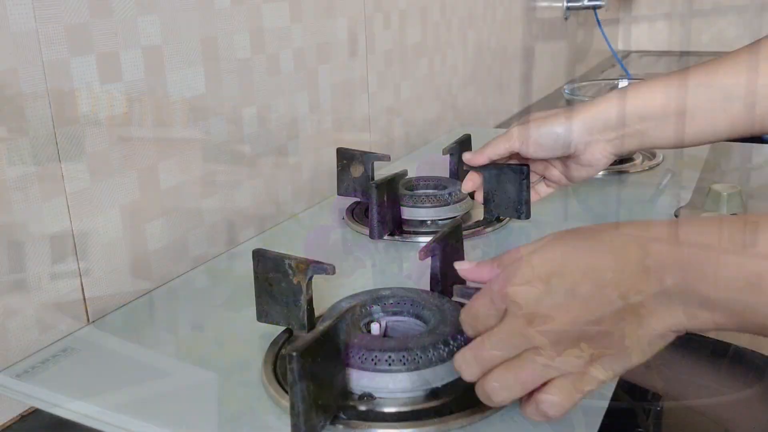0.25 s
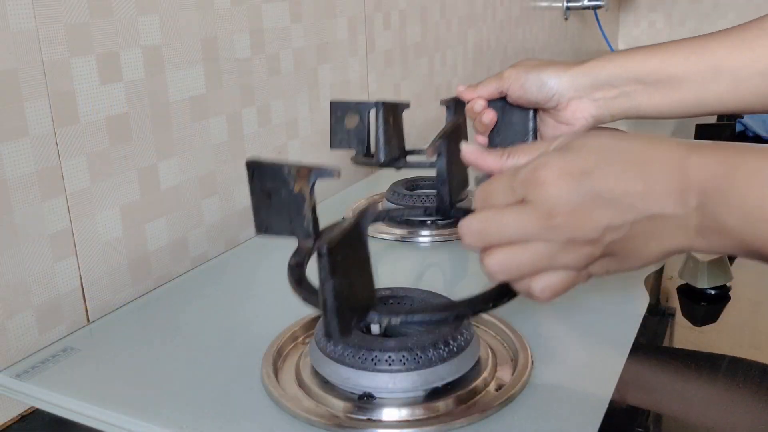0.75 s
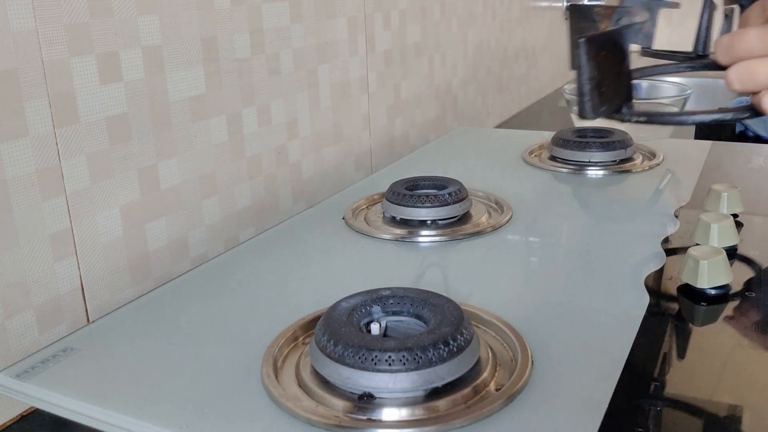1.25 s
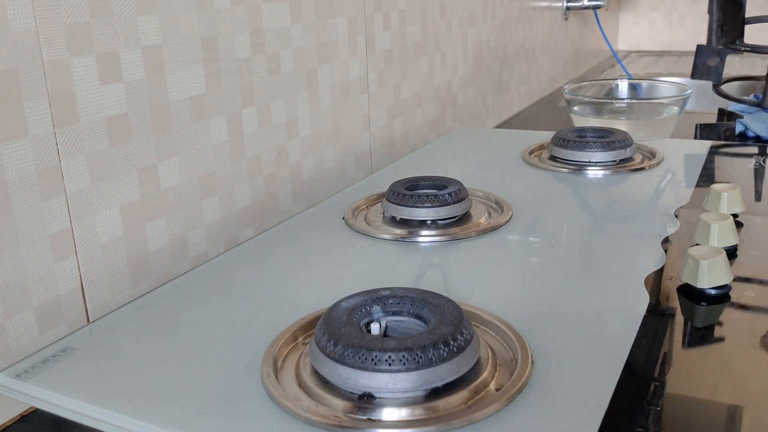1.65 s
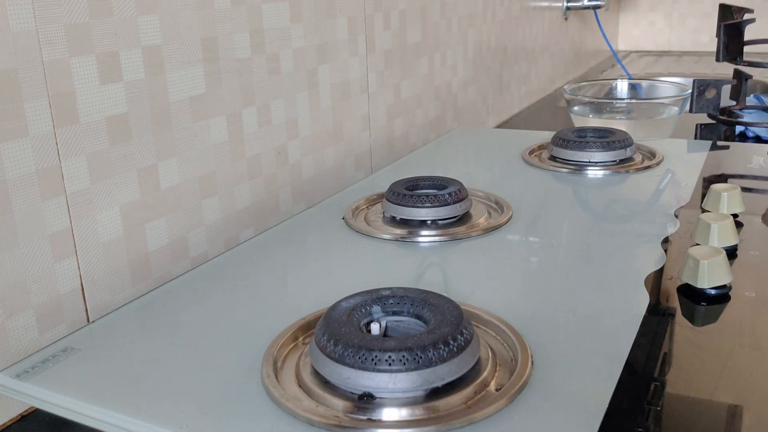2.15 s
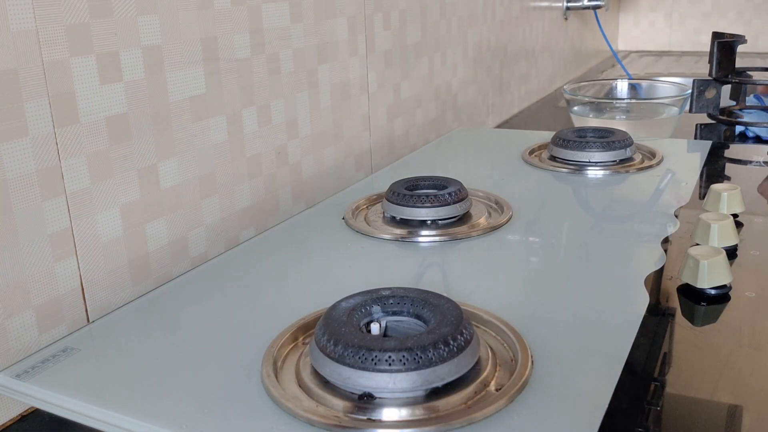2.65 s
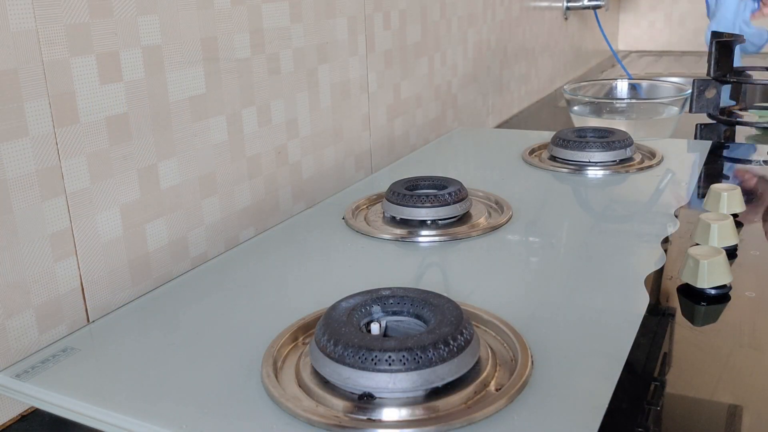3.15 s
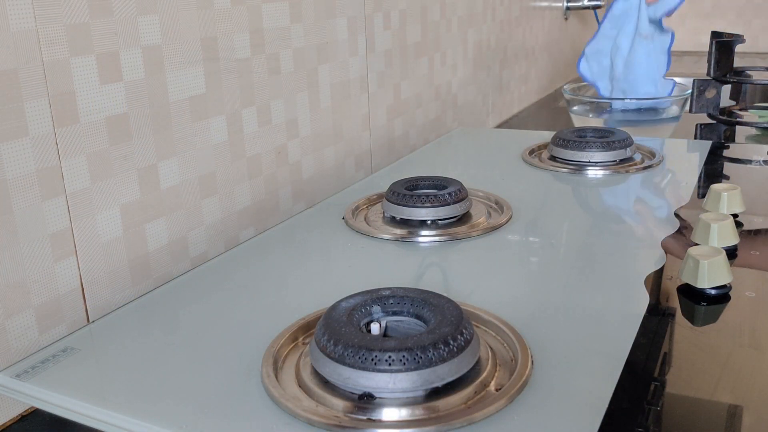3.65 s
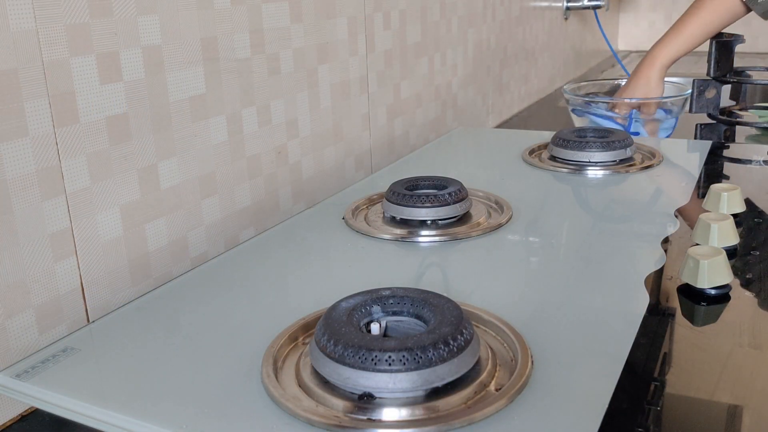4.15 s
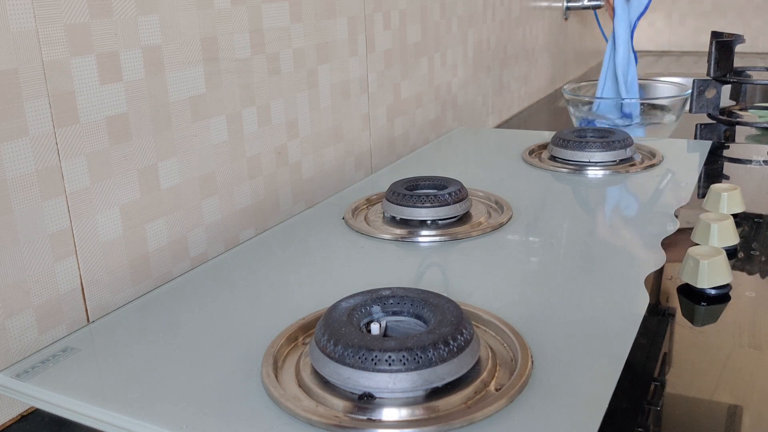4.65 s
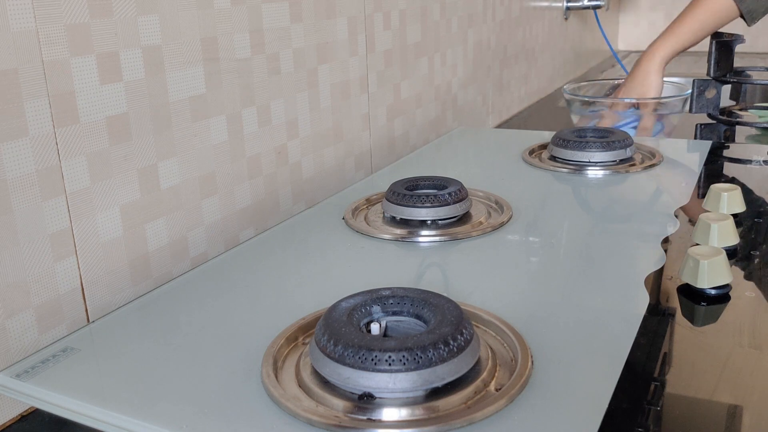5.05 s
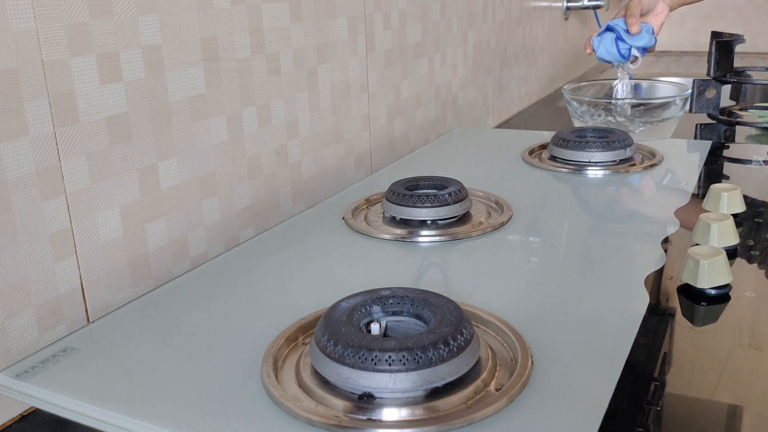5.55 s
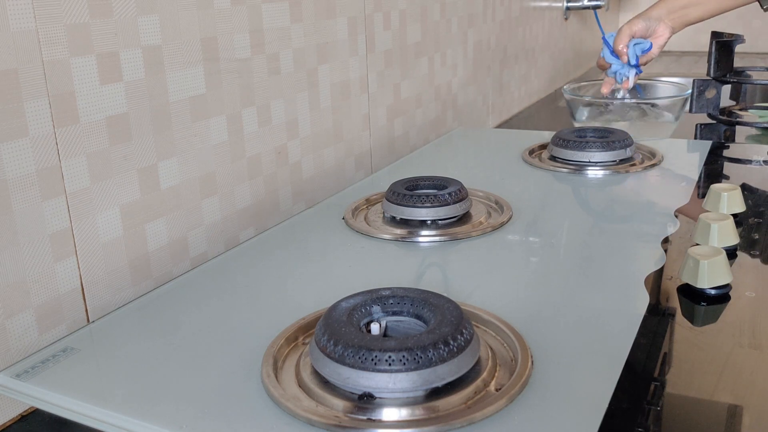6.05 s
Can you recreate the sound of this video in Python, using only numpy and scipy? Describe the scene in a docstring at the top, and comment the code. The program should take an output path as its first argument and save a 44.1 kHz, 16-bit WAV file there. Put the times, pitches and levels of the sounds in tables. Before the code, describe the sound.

In a hard, echoing kitchen with a soft low hum, heard in stereo by a phone near the stove: wind rumble opens and dies away, cast iron clunks as it leaves glass, then two groups of sharp knocks and thuds ring on stone. Sparse spitting drops follow. Later, gentle dips and bubbles in a bowl of water grow into a bright, gurgling pour from a squeezed cloth.

```python
"""Two cast-iron pot stands are lifted off a glass hob and set down on a stone counter in a hard-walled kitchen:
each contact excites damped modes of the surface and the iron, with noise bursts for the knock and crack.
A hose spits faint drops; a cloth is dipped in a bowl, lifted and wrung out: drops splat as noise, bubbles ring
as damped sines and water trickles. Wind rumble from an open balcony, filtered noise, dies away early over a
steady drone and murmur. A diffuse echo of the room follows every contact, tick, drop and bubble."""
import sys
import numpy as np
from scipy import signal
from scipy.fft import rfft, irfft, next_fast_len
from scipy.io import wavfile
from scipy.ndimage import uniform_filter1d, map_coordinates

SR = 44100
rng = np.random.default_rng(int(sys.argv[2]) if len(sys.argv) > 2 else 0)


def to_linear_factor(level_db):
    """Convert decibel levels (scalar or array-like) to linear amplitude factors."""
    exponent = np.asarray(level_db, float) / 20
    return 10 ** exponent


def wrap_up_sound(samples):
    """Save the sound to the file named by the first command line argument, as 16-bit audio."""
    columns = np.atleast_2d(samples).T
    # keep every value between -1 and 1, then stretch to whole-number steps
    tamed = np.clip(columns, -1, 1)
    steps = np.round(tamed * 32767).astype(np.int16)
    wavfile.write(sys.argv[1], SR, steps)


N = 277830


def stands():
    """Impact excitation: each contact thuds in the surface below, knocks, cracks and rings the iron."""
    # iron meets glass or stone: t/s, thud peak level/dB, knock peak level/dB, iron ring level/dB
    contacts = [(.53, -56, -42.5, -80), (.585, -45, -43, -78), (.746, -26, -35.5, -87),
                (.757, -46, -32.5, -85), (.78, -19.5, -20, -36), (.809, -22.5, -62, -70),
                (1.801, -41, -37, -93), (2.254, -55, -36, -61), (2.266, -23.5, -15.5, -34),
                (2.288, -18, -17, -31.5), (2.343, -20.5, -27, -41.5), (2.359, -25.5, -28, -35),
                (2.418, -29, -38, -75), (2.478, -33.5, -31.5, -64), (2.828, -45, -39, -74),
                (2.839, -22.5, -16.5, -45), (2.868, -19, -29.5, -79), (2.929, -22, -27, -74),
                (2.989, -25.5, -37.5, -75.5), (3.049, -36, -55, -81), (3.129, -43.5, -62, -96),
                (4.214, -41, -41.5, -85)]
    # modes of the iron, a list each for held, first stand, second stand: f/Hz, relative level/dB, t60/s
    iron_modes = [
        [(1554, -15, 0.12), (2535, -6, 0.14), (2840, -10, 0.13), (3650, -10.5, 0.058), (4070, -13, 0.13)],
        [(2290, -1, 0.34), (2540, -17, 0.49), (2692, -1.5, 0.49), (2868, -14.5, 0.39), (3160, -14, 0.43),
         (3260, -11, 0.19), (6100, -14, 0.19), (6600, -25, .25), (7260, -23.5, 0.15), (8380, -24, 0.11),
         (9100, -33, .12)],
        [(2133, 16.5, 0.34), (2690, -1, 0.45), (2800, -7, 0.46), (3180, -8, 0.32), (3346, -2.5, 0.24),
         (3680, -11, 0.2), (3950, -4, 0.27), (5900, -0.5, 0.1), (6150, -18, .28), (6900, -6.5, 0.26),
         (7540, -24, 0.15), (9000, -14, 0.14)],
    ]
    # modes of the glass top: f/Hz, width/Hz, relative level/dB
    glass_modes = [(103, 9, -3), (151, 25, -3.5), (168, 16, 3.5), (271, 18.7, -0.5), (346, 31, -3),
                   (493, 12, -9)]
    # modes of the slab and cupboard: f/Hz, width/Hz, relative level/dB
    counter_modes = [(102.4, 10.4, 0), (128.4, 9.8, -7), (140, 10, -2), (164.6, 15, -7), (249.3, 26, -6),
                     (287.4, 8.8, 4.5), (350, 30, -7.5)]
    # spectrum of the contact itself, a list for each stage: f/Hz, relative level/dB per Hz
    contact_spectra = [
        [(240, -13), (400, -3), (723, -6), (1120, -20), (2830, -24), (5350, -43.5), (6610, -41.5),
         (13900, -63.5), (15000, -56)],
        [(240, -36), (400, -3.5), (473, -7), (701, 2.5), (854, -5.5), (1290, -6.5), (2030, -14.5), (2790, -25),
         (3550, -36), (15000, -74)],
        [(240, -49), (400, -13), (593, 0.5), (1940, -19), (2150, -19), (4130, -44.5), (4880, -64),
         (5950, -43.5), (9230, -39), (15000, -106)],
    ]
    # start of the first and second stand's contacts with the counter: t/s
    set_down_s = [1.7, 2.7]
    # rise of the crack in each stage: time constant/s
    crack_attack_s = [0.00048, 0.00079, 0.0037]
    # crack peak over the iron ring setting in each stage: level/dB
    crack_over_ring_db = [8.5, 3, 14]
    # left over right in each stage: level/dB
    left_over_right_db = [1, 0.5, 1.5]
    out = np.zeros((2, N))
    t = np.arange(SR // 2) / SR
    for s, thud_db, knock_db, ring_db in contacts:
        stage = np.searchsorted(set_down_s, s)
        surface_modes = counter_modes if stage else glass_modes
        place = dict(pan_db=left_over_right_db[stage], lag=12)  # reaches the right side first
        ring = to_linear_factor(ring_db) * ringing(iron_modes[stage], t) * (1 - np.exp(-t / 0.0012))
        add(out, s, ring, wet_db=-7, **place)

        push = np.exp(-t / 0.00071) * (t < .01)
        # the surface modes, with a first-order high-pass at 70 Hz
        thud = filtered(push, lambda f: surface(surface_modes, f) * 1j * f / (70 + 1j * f))
        sound = to_linear_factor(thud_db) * thud / np.abs(thud).max()
        contact = lambda f: to_linear_factor(along(contact_spectra[stage], f))
        sound[:SR // 8] += to_linear_factor(knock_db) * burst(0.051, 0.00081, contact)
        crack = burst(0.015, crack_attack_s[stage], lambda f: contact(f) * (f > 2500))
        sound[:SR // 8] += to_linear_factor(ring_db + crack_over_ring_db[stage]) * crack
        add(out, s, sound, wet_db=0, **place)
    return out


def surface(modes, f):
    """Modal superposition: second-order resonances of alternating sign sum to the surface's response."""
    total = 0
    for k, (centre, width, db) in enumerate(modes):
        damping = 1j * f * width
        total = total + (-1) ** k * to_linear_factor(db) * damping / (centre ** 2 - f ** 2 + damping)
    return total


def ringing(modes, t):
    """Mode splitting: a nearly round casting has every mode twice, so each beats with its weaker twin."""
    twin = 0.0042  # distance of the twin as a share of the pitch
    total = 0
    for hz, db, t60 in modes:
        strength = to_linear_factor(db + rng.normal(0, 1) - 60 * t / t60)  # struck anew each time
        pair = np.sin(2 * np.pi * hz * t) + 0.6 * np.sin(2 * np.pi * hz * (1 + twin) * t)
        total = total + strength * pair
    return total


def bubbles():
    """Bubble resonance: trapped air rings a few cycles, its pitch rising as it nears the surface."""
    # air bubbles caught under the surface: t/s, nominal level/dB, nominal f/Hz, life/cycles
    caught = [(3.3698, -53.5, 1910, 7.6), (4.2844, -41, 3850, 12), (4.3515, -33.5, 3950, 9.6),
              (4.5456, -45, 1870, 7.4), (4.548, -39, 2460, 5.5), (4.6453, -43.5, 2530, 7.4),
              (4.7012, -25.5, 2516, 4.8), (4.7476, -33.5, 2540, 6.2), (4.7536, -42, 3720, 13),
              (4.8214, -43.5, 2360, 6.7), (4.8973, -47, 2440, 7), (5.0225, -39.5, 3000, 14),
              (5.0604, -46, 4040, 12), (5.0679, -26.5, 1713, 11), (5.1044, -50, 1810, 13),
              (5.1362, -40, 3020, 5.8), (5.1806, -37, 2410, 6.2), (5.597, -45.5, 1520, 18),
              (5.689, -46.5, 920, 7.1), (5.7444, -43.5, 2280, 9.2), (5.7568, -40.5, 3270, 9),
              (5.7658, -38, 1810, 9), (5.7894, -43.5, 2390, 9.4), (5.883, -31, 814, 5.5),
              (5.888, -22.5, 1033, 5.3), (5.909, -43, 1040, 4.5), (5.9144, -28.5, 2920, 5.4),
              (5.934, -33.5, 728, 3.3), (5.937, -30, 1013, 5), (6.047, -18, 686, 4.3),
              (6.055, -22.5, 1016, 3.8), (6.072, -28, 1100, 1.9), (6.073, -31, 700, 3.1),
              (6.0841, -24, 5700, 11.6), (6.099, -32, 653, 3.5), (6.1045, -23, 4390, 7.3),
              (6.137, -42, 1700, 5.5), (6.141, -26, 630, 2.5), (6.159, -33, 647, 4.6),
              (6.1918, -43, 2290, 10), (6.215, -32.5, 966, 2.7), (6.2244, -32, 2880, 9.5),
              (6.259, -40, 865, 5)]
    out = np.zeros((2, N))
    for s, db, hz, life in caught:
        u = np.arange(SR // 16) / SR * hz / life  # time in lifetimes
        phase = 2 * np.pi * life * (0.947 * u + 0.036 * u * u)
        envelope = (1 - np.exp(-(u / 0.34) ** 1.17)) * np.exp(-u)
        add(out, s, to_linear_factor(db) * envelope * np.sin(phase), wet_db=-1, lag=5)
    return out


def splats():
    """Drop impact: drips share one colour, while splashes lean dull or bright."""
    # water from the cloth hitting the bowl: t/s, peak level/dB, tilt from 5 to 9.5 kHz/dB
    splashes = [(4.049, -58.5, 18), (4.3294, -40, -9), (4.3787, -44.5, -13), (4.5099, -39.5, -2.5),
                (4.7049, -42.5, -13), (4.789, -58, 13), (4.8182, -51.5, -21), (5.0067, -44.5, -11.5),
                (5.0549, -42.5, -9), (5.091, -46.5, -15), (5.1904, -50, 4), (5.3304, -49, 12),
                (5.602, -56.5, -14), (5.6785, -44.5, 17), (5.7697, -50, 13), (5.858, -44.5, -1),
                (5.884, -39, -15), (5.9468, -41.5, -16), (6.0508, -31.5, -11), (6.1184, -37.5, -4),
                (6.138, -46, -10), (6.21, -38, -20), (6.246, -44.5, 5)]
    # drops spat from the hose: t/s, peak level/dB
    drips = [(0.2547, -50.5), (0.419, -45.5), (0.601, -60), (1.2715, -50.5), (1.4421, -46.5), (2.0598, -53),
             (2.147, -46), (2.306, -44), (3.4518, -45.5), (3.6013, -46), (3.9212, -57.5), (4.126, -47),
             (4.282, -41), (4.67, -48.5), (4.9157, -46), (5.7953, -52.5)]
    edge_db = 3.5  # mean gain of a splash at 5 and 9.5 kHz, relative to 7 kHz
    out = np.zeros((2, N))
    for s, db, tilt_db in splashes:
        splat(out, s, db, edge_db - tilt_db / 2, edge_db + tilt_db / 2)
    for s, db in drips:
        splat(out, s, db, dull_db=-5, bright_db=-6)
    return out


def splat(out, s, db, dull_db, bright_db):
    """Transient noise: a drop bursts in a few milliseconds; the room smears it into a short hiss."""
    # spectrum shared by all drops: f/Hz, relative level/dB per Hz
    drop_spectrum = [(1470, -13.5), (2500, -24.5), (2790, -16), (3010, -6.5), (4310, -10), (4990, -13),
                     (6400, -8), (7360, -1.5), (8800, -16), (9730, 0), (12700, -4.5), (14900, -4.5),
                     (16000, -33)]
    lean = [(5000, dull_db), (7000, 0), (9500, bright_db)]
    colour = lambda f: to_linear_factor(along(drop_spectrum, f) + along(lean, f))
    add(out, s, to_linear_factor(db) * burst(0.0091, 0.0013, colour), wet_db=8, lag=5)


def trickle():
    """Superposed bubble resonances: running water is a hiss and a fizz of tiny bubbles, both following the flow."""
    # water running out of the cloth: t/s, level/dB before the flutter
    flow = [(3.1, -93), (3.4, -67), (3.7, -84), (3.95, -70.5), (4.24, -71), (4.38, -65.5), (4.62, -72.5),
            (5.12, -67.5), (5.4, -81), (5.66, -74), (5.86, -61.5), (6.03, -56), (6.14, -50), (6.3, -52.5)]
    # hiss of the running water: f/Hz, relative level/dB per Hz
    hiss_spectrum = [(240, -58), (400, -55), (676, -6.5), (814, -12.5), (1060, -14.5), (1530, -58),
                     (1650, -17), (8900, -29), (14400, -26.5), (16000, -41)]
    flow_s, level_db = np.transpose(flow)
    flow_db = np.interp(np.arange(N) / SR, flow_s, level_db, -120, -120)
    when, pitch, size, side = rng.random((7000, 4)).T
    hz = 3500 * np.exp(1.8 * (pitch - 0.5))[:, None]
    t = np.arange(SR // 100) / SR
    strength = -np.log(size)[:, None]
    grains = strength * np.exp(-t * hz / 8) * np.sin(2 * np.pi * hz * t)  # life of 8 cycles
    at = (when[:, None] * N).astype(int) + np.arange(len(t))
    fizz = []
    for share in (side, 1 - side):  # left, right
        fizz.append(np.bincount(at.ravel(), (share[:, None] * grains).ravel(), N + SR)[:N])
    hiss = rush(hiss_spectrum, patchy_db=2.5)
    return to_linear_factor(flow_db + 2.9 * wobble(34)) * (hiss + to_linear_factor(-8) * unit(np.array(fizz)))


def balcony():
    """Turbulence noise: gusty buffeting and street air, with a few ticks of small metal and faint whistles."""
    # gusts: middle t/s, swell level/dB
    gusts = [(.03, 7), (.19, 8), (.46, 7.5), (.6, 7), (.69, 12.5)]
    # wind buffeting: f/Hz, relative level/dB per Hz
    buffet_spectrum = [(24, -29), (40, -12), (59, 2.5), (166, -5.5), (200, -4.5), (297, -14.5), (400, -18),
                       (520, -60), (880, -120)]
    # street air: f/Hz, relative level/dB per Hz
    street_spectrum = [(180, -27), (300, -8), (416, -18.5), (554, -5), (613, -15), (1440, -22.5),
                       (2860, -27.5), (6000, -51.5), (7800, -55), (13200, -120)]
    # small metal ticks: t/s, peak level/dB of the burst, ring level/dB
    ticks = [(0.0306, -39, -67), (0.599, -60, -80)]
    # modes of the small metal: f/Hz, relative level/dB, t60/s
    jingle_modes = [(4730, -7, 0.54), (5750, -9, 0.38), (6100, -7, .15), (6870, -1, 0.11), (7650, -9, 0.58),
                    (9050, -3, .15), (10700, -4, 0.246)]
    # wavering whistles: middle t/s, half length/s, mean f/Hz, level/dB before the wavering
    whistles = [(0.028, 0.086, 2720, -64.5), (0.3, 0.13, 2900, -72.5)]
    time = np.arange(N) / SR
    gust_db = sum(db * np.exp(-((time - s) / 0.064) ** 2) for s, db in gusts)
    buffet = to_linear_factor(-50 + gust_db + 2.0 * wobble(12.2)) * rush(buffet_spectrum, patchy_db=2.5)
    street_rise = 1 - 0.25 * np.exp(-time / 0.05)
    street = to_linear_factor(-51.5) * street_rise * rush(street_spectrum, patchy_db=3.5)
    out = to_linear_factor(outdoors_db()) * (buffet + street)

    t = np.arange(SR // 4) / SR
    for s, db, ring_db in ticks:
        tick = to_linear_factor(ring_db) * ringing(jingle_modes, t)
        tick[:SR // 8] += to_linear_factor(db) * burst(0.0039, 0.00013, lambda f: f > 4500)
        add(out, s, tick, wet_db=3)
    for s, half, hz, db in whistles:
        pitch = hz + 30 * wobble(60)
        envelope = to_linear_factor(db + 7.1 * wobble(43.7)) * np.exp(-((time - s) / half) ** 4)
        out += envelope * np.sin(2 * np.pi * np.cumsum(pitch) / SR)
    return out


def outdoors_db():
    """Exponential decay: the gain of the balcony air falls linearly in dB once it begins to die away."""
    fade_s, fade_db_per_s = 0.76, 241
    return -fade_db_per_s * np.maximum(np.arange(N) / SR - fade_s, 0)


def air():
    """Stationary noise: the kitchen's drone and murmur are diffuse, its low draughts independent left and right."""
    # kitchen drone: f/Hz, relative level/dB per Hz
    drone_spectrum = [(15, -32), (25, -28.5), (102, 0), (125, -10), (177, -6), (213, -20), (246, -3.5),
                      (270, -17.5), (321, -9), (408, -18.5), (600, -26), (780, -62), (1320, -120)]
    # kitchen murmur: f/Hz, relative level/dB per Hz
    murmur_spectrum = [(240, -29), (400, -13), (528, -21), (588, -5.5), (645, -15), (730, -9),
                       (1680, -23.5), (2800, -20.5), (4580, -37.5), (14800, -37), (16000, -31)]
    time = np.arange(N) / SR
    # the drone sinks by 3 dB per second at the end
    drone_db = -55 - 3 * np.maximum(time - 5.9, 0) + 0.5 * wobble(9)
    drone = to_linear_factor(drone_db) * rush(drone_spectrum, patchy_db=0.5)
    murmur = to_linear_factor(-66) * rush(murmur_spectrum, patchy_db=2.5)

    draught = unit(filtered(rng.standard_normal((2, N)), lambda f: f / (1 + (f / 32) ** 4)))
    indoor_gain = to_linear_factor(-70.5 + 1.4 * time)  # grows by 1.4 dB per second
    outdoor_gain = to_linear_factor(-51 + outdoors_db())
    return drone + murmur + (indoor_gain + outdoor_gain) * draught


def add(out, s, sound, wet_db, pan_db=0, lag=0):
    """Reverberation: adds a sound at s seconds with a fresh diffuse echo; lag in samples delays the direct left."""
    # decay of the room: f/Hz, t60/s
    room = [(100, 0.29), (400, 0.38), (1500, 0.31), (4000, 0.24), (10000, 0.24)]
    length = SR * 3 // 5
    decay = lambda hz, t: to_linear_factor(-60 * (t / along(room, hz)) ** 0.87) * (1 - np.exp(-t / 0.0076))
    lumps = to_linear_factor(0.9 * wobble(86.0, size=length))  # single walls stand out of the echo
    echo = unit(lumps * diffuse(length, decay)) / np.sqrt(length)
    heard = to_linear_factor(wet_db) * signal.fftconvolve(sound[None], echo, axes=1)
    heard[0, lag:lag + len(sound)] += sound
    heard[1, :len(sound)] += sound
    place = out[:, round(s * SR):][:, :heard.shape[1]]
    place += to_linear_factor([[pan_db / 2], [-pan_db / 2]]) * heard[:, :place.shape[1]]


def burst(t60, attack, response):
    """Shaped noise: a puff through a response rises, then decays exponentially; its peak is 1."""
    t = np.arange(SR // 8) / SR
    noise = filtered(rng.standard_normal(len(t)), response)
    puff = noise * to_linear_factor(-60 * t / t60) * (1 - np.exp(-t / attack))
    return puff / np.abs(puff).max()


def rush(spectrum, patchy_db):
    """Modulated noise: a diffuse rush has smooth patches of random gain in time and frequency."""
    def field(hz, t):
        smooth = uniform_filter1d(rng.standard_normal((len(hz), len(t))), 4, 0)
        return to_linear_factor(patchy_db * unit(uniform_filter1d(smooth, 24, 1)))
    return diffuse(N, field, spectrum)


def diffuse(length, field, spectrum=((1, 0),)):
    """Diffuse-field coherence: stereo noise from all sides; field(hz, t) is its gain in time and frequency."""
    # sound from all sides: f/Hz, left-right likeness (correlation)
    likeness = [(60, 1), (150, 0.81), (380, 0.81), (950, -0.058), (2380, -0.047), (5980, 0.57), (15000, 1)]
    hz, t, z = signal.stft(rng.standard_normal((2, length)), SR, nperseg=256)
    pair = signal.istft(z * field(hz[:, None], t), SR, nperseg=256)[1][:, :length]

    def mid_side_gain(f):
        angle = np.arccos(np.clip(along(likeness, f), -1, 1)) / 2
        return to_linear_factor(along(spectrum, f)) * [np.cos(angle), np.sin(angle)]
    mid, side = filtered(pair, mid_side_gain)
    return unit(np.array([mid + side, mid - side]))


def filtered(x, response):
    """Linear filtering: multiplies the spectrum of x by a complex response of frequency."""
    m = next_fast_len(x.shape[-1] + 8192)
    return irfft(rfft(x, m) * response(np.fft.rfftfreq(m, 1 / SR)), m)[..., :x.shape[-1]]


def wobble(rate, size=N):
    """Random modulation: a smooth curve through random knots, rate of them a second."""
    return map_coordinates(rng.standard_normal(size // 100 + 4), [np.arange(size) * rate / SR])


def along(points, hz):
    """Logarithmic frequency scale: interpolates (f/Hz, value) points on it."""
    f, v = np.transpose(points)
    return np.interp(np.log(hz + 1), np.log(f + 1), v)


def unit(x):
    """Root-mean-square normalisation: scales x to rms 1."""
    return x / np.sqrt(np.mean(x ** 2) + 1e-20)


def scene():
    """Linear superposition: all sources add as they reach the two microphones."""
    return stands() + bubbles() + splats() + trickle() + balcony() + air()


def low_pass(x):
    """Removes everything above the highest recorded frequency."""
    return signal.sosfilt(signal.butter(12, 16500, fs=SR, output="sos"), x)


def record(dry):
    """Band limitation: a phone's steep low-pass ends the treble near 15.5 kHz."""
    mix = filtered(dry, lambda f: 1 / (1 + (f / 15500) ** 60))
    return low_pass(mix)


dry = scene()
out = record(dry)
wrap_up_sound(out)
```